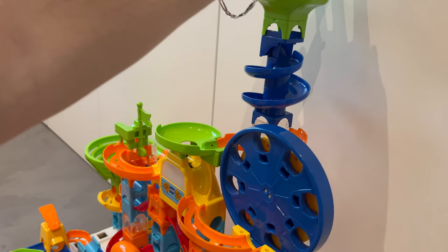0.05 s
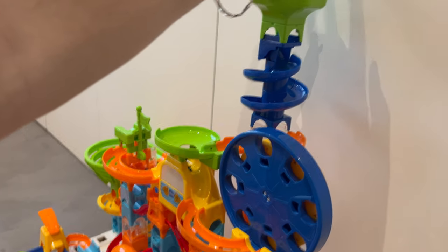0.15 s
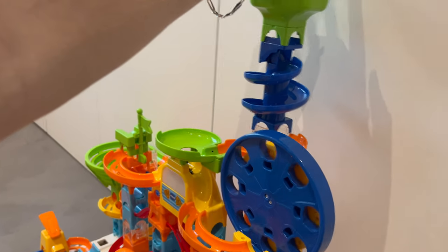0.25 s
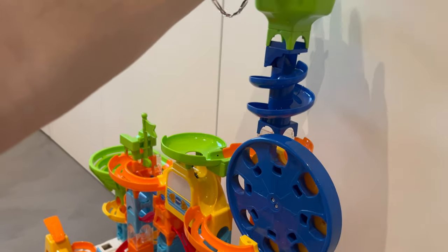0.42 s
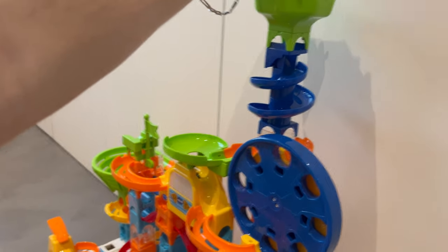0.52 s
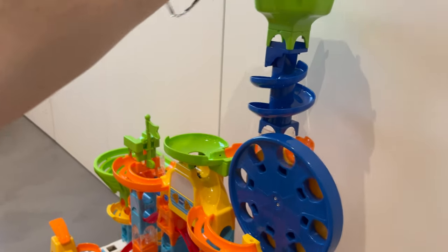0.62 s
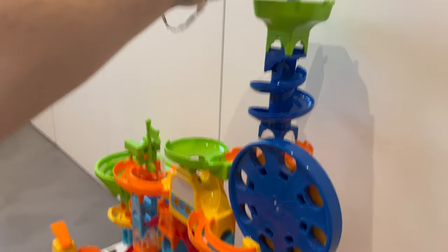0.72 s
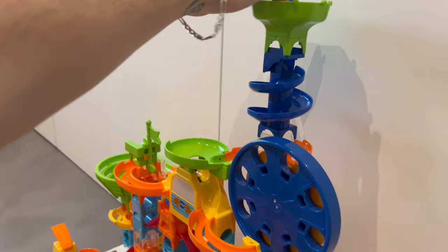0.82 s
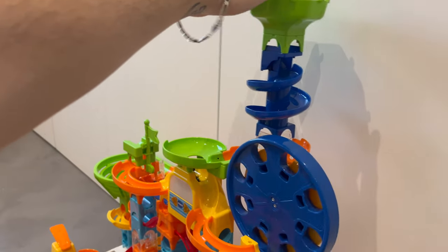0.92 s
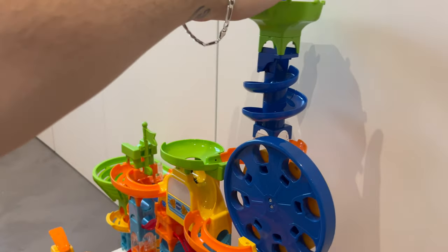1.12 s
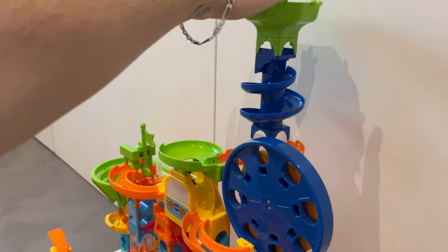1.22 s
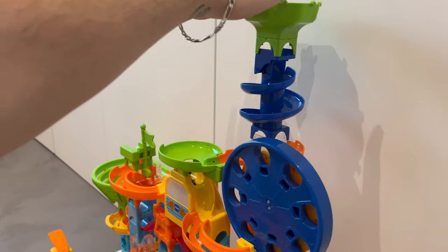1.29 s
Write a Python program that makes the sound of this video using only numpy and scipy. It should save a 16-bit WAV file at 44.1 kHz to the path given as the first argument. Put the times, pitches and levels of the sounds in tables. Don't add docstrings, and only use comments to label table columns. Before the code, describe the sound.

Plastic balls clack and rattle through a toy tower's chutes, pause, then tumble again more softly

```python
import sys
import numpy as np
from scipy import signal
from scipy.fft import rfft, irfft, next_fast_len
from scipy.io import wavfile
from scipy.ndimage import map_coordinates

SR = 44100
rng = np.random.default_rng(int(sys.argv[2]) if len(sys.argv) > 2 else 0)


def dump_mix(stems):
    frames = np.atleast_2d(stems).T
    limited = np.clip(frames, -1, 1)
    pcm = np.round(limited * 32767).astype(np.int16)
    wavfile.write(sys.argv[1], SR, pcm)


def gain_from_db(level_db):
    decades = np.asarray(level_db, float) / 20
    return 10 ** decades


N = 59535
BEFORE = SR // 4


def unit(x):
    return x / np.sqrt(np.mean(x ** 2) + 1e-20)


def along(points, hz):
    f, v = np.transpose(points)
    return np.interp(np.log(hz + 1), np.log(f + 1), v)


def filtered(x, response):
    m = next_fast_len(x.shape[-1] + 8192)
    spectrum = rfft(x, m) * response(np.fft.rfftfreq(m, 1 / SR))
    return irfft(spectrum, m)[..., :x.shape[-1]]


def wobble(rate_hz):
    knots = rng.standard_normal(int(N * rate_hz / SR) + 4)
    return map_coordinates(knots, [np.arange(N) * rate_hz / SR])


def dying(spectrum, t60_s, t, rise_s):
    noise = unit(filtered(rng.standard_normal(len(t)), spectrum))
    return noise * gain_from_db(-60 * t / t60_s) * (1 - np.exp(-t / rise_s))


# frequency in Hz, level in dB, t60 in seconds.
SHELL = [(810, -10, .15), (930, -10, .15), (1100, -10, .1), (1300, -12, .1), (1490, -10, .14),
         (1900, -6, .1), (2260, -8, .12), (2458, -5, .09), (2750, -6, .08), (2900, -5, .09),
         (3347, -5, .09), (3590, -8, .09), (4010, -9, .07), (4380, -6, .05)]
# frequency in Hz, level in dB.
WALL = [(300, -33), (600, -26.5), (1100, -2.5), (2000, 2), (3200, 1), (4600, -1.5), (6000, -10.5),
        (8000, -14.5)]
# frequency in Hz, level in dB.
CLICK = [(1500, -53), (3500, -8), (6000, -3), (8000, 4), (10500, -8), (13000, -8), (15000, -8),
         (16500, -12.5)]
# frequency in Hz, level in dB.
THUD = [(60, -38), (200, -24), (330, -14), (420, -4), (550, -5.5), (800, 0), (1200, -8), (2000, -30)]
MODES_DB, MODE_SPREAD_DB, DETUNE = -8.5, 2, .002
BEAT_HZ, SKEW_RAD = 14, .8
FOCUS_DB_PER_OCTAVE = 3.5
RISE_S, SLOW_RISE_S = .0008, .0018
PING_DB, PING_T60_S = -5, .06
SNAP_DB, SNAP_T60_S, SNAP_HZ = 1, .005, 3300
WALL_DB, WALL_T60_S, KNOCK_DB, KNOCK_T60_S = -13.5, .14, 6, .03
CLICK_DB, CLICK_T60_S, CRACK_DB, CRACK_T60_S = 9, .025, 4, .018
THUD_DB, THUD_T60_S = 1, .093


def clack(click_db, thud_db, focus_hz):
    t = np.arange(SR // 4) / SR

    def off_db(hz):
        return -FOCUS_DB_PER_OCTAVE * np.abs(np.log2((hz + 1) / focus_hz))

    def wall_colour(hz):
        return gain_from_db(along(WALL, hz) + off_db(hz))

    def click_colour(hz):
        return gain_from_db(along(CLICK, hz))

    def thud_colour(hz):
        return gain_from_db(along(THUD, hz))

    ring = np.zeros(len(t))
    for hz, db, t60_s in SHELL:
        louder, sharper, phase, beat = rng.standard_normal(4)
        level = gain_from_db(db + off_db(hz) + MODE_SPREAD_DB * louder - 60 * t / t60_s)
        tone = np.sin(2 * np.pi * hz * (1 + DETUNE * sharper) * t + SKEW_RAD * phase)
        ring += level * tone * np.cos(2 * np.pi * BEAT_HZ * beat * t)
    ping = gain_from_db(PING_DB - 60 * t / PING_T60_S) * np.sin(2 * np.pi * focus_hz * t)
    tonal = (gain_from_db(MODES_DB) * ring + ping) * (1 - np.exp(-t / RISE_S))

    snap = gain_from_db(SNAP_DB - 60 * t / SNAP_T60_S) * np.sin(2 * np.pi * SNAP_HZ * t)
    wall = dying(wall_colour, WALL_T60_S, t, RISE_S)
    wall += gain_from_db(KNOCK_DB) * dying(wall_colour, KNOCK_T60_S, t, SLOW_RISE_S)
    click = dying(click_colour, CLICK_T60_S, t, RISE_S)
    click += gain_from_db(CRACK_DB) * dying(click_colour, CRACK_T60_S, t, SLOW_RISE_S)
    thud = dying(thud_colour, THUD_T60_S, t, .0008)
    return (snap + tonal + gain_from_db(WALL_DB) * wall
            + gain_from_db(CLICK_DB + click_db) * click + gain_from_db(THUD_DB + thud_db) * thud)


# start in seconds, peak in dB, click over body in dB, thud over body in dB, ring focus in Hz.
EARLIER = [
    (-.06, -20.5, -21.5, -8.5, 1978),
    (-.01, -44, -18, -30.5, 1500),
]
# start in seconds, peak in dB, click over body in dB, thud over body in dB, ring focus in Hz.
FIRST_FALL = [(0.0544, -38, -28, -7.5, 1834), (0.0964, -41, -31, -39, 3530), (0.1885, -27, -25, -17, 3087),
              (0.192, -30, -24, -19, 1970), (0.2332, -19, -7, -21, 1830), (0.2387, -11.5, -8.5, -41, 3024),
              (0.241, -13, -7, -25, 4427), (0.2425, -18, -26, -25, 3365), (0.2445, -11, -37, -26, 1880),
              (0.2674, -18, -21, -25, 2222), (0.2824, -16.5, -14.5, -31, 2370),
              (0.3043, -11.5, -24.5, -31.5, 2455), (0.3066, -24.5, -14, -10.5, 3430),
              (0.3174, -19.5, -16.5, -20, 2760), (0.3394, -11.5, -20, -21, 1872),
              (0.347, -19, -29.5, -19.5, 2234), (0.3614, -17, -15.5, -21.5, 1890),
              (0.3744, -18.5, -26.5, -18, 2220), (0.3955, -28.5, 0, -19, 2840),
              (0.3983, -17, -4.5, -15.5, 2170), (0.4017, -21, -7, -17.5, 3210),
              (0.4114, -16.5, -38, -28, 1485), (0.425, -19.5, -35, -23, 1500),
              (0.4395, -24.5, -11.5, -12, 2846), (0.446, -22.5, -21, -12.5, 1500),
              (0.553, -46, -44, -35, 3630)]
# start in seconds, peak in dB, click over body in dB, thud over body in dB, ring focus in Hz.
SECOND_FALL = [(0.8037, -34, -12.5, -10, 2240), (0.807, -22, -15.5, -14.5, 2234),
               (0.815, -27.5, -23, -17.5, 1004), (0.8245, -23, -22.5, -18.5, 2850),
               (0.8642, -31, -15, -29, 2210), (0.8756, -26, -11.5, -11, 1900),
               (0.882, -22.5, -14, -17.5, 2800), (0.8914, -26.5, -18, -18, 783),
               (0.9039, -25, -16, -11.5, 2044), (0.9193, -26, -22, -24, 1900),
               (0.9595, -23, -10.5, -10.5, 2524), (0.963, -19.5, -24, -18, 2990),
               (0.967, -18.5, -11.5, -19, 1935), (0.9853, -25, -14, -16, 2300),
               (1.009, -22.5, -20, -13, 1900), (1.0135, -24.5, -8.5, -8, 920),
               (1.0183, -14, -24, -18.5, 3423), (1.021, -14, -34.5, -18.5, 2970),
               (1.026, -26, -21, -19, 2387), (1.0864, -36, -11, -8, 915), (1.098, -29.5, -19, -9, 1928),
               (1.163, -34, -19, -8, 2040), (1.1718, -29, -19.5, -10, 2865), (1.177, -33, -23, -15, 757),
               (1.184, -30.5, -22, -15, 2650), (1.189, -34, -30, -13, 4380), (1.2231, -32, -25, -14.5, 950),
               (1.3117, -45, -31, -8.5, 2050), (1.3349, -34, -26, -6, 935),
               (1.3385, -31, -15.5, -13.5, 1900), (1.3418, -28, -48, -27, 2020)]


def clacks():
    out = np.zeros(BEFORE + N + SR)
    for s, db, *colour in list(EARLIER) + list(FIRST_FALL) + list(SECOND_FALL):
        out[BEFORE + round(s * SR):][:SR // 4] += gain_from_db(db) * clack(*colour)
    return out[:BEFORE + N]


# time in seconds, level in dB.
RATTLE = [(0, -41), (.12, -58), (.17, -61), (.225, -56), (.25, -31.5), (.44, -29), (.5, -44), (.62, -47),
          (0.786, -58.5), (.82, -36.5), (0.929, -33.5), (.955, -62), (0.982, -26.5), (1.05, -40.5),
          (1.11, -45), (1.15, -53), (1.2, -40.5), (1.29, -53)]
RATTLE_PER_S, RATTLE_DB, SCATTER_DB = 260, -5, 4


def rattle(places=8):
    s, db = np.transpose(RATTLE)
    strength = gain_from_db(RATTLE_DB + np.interp(np.arange(-BEFORE, N) / SR, s, db))
    struck = rng.random((places, BEFORE + N)) < RATTLE_PER_S / places / SR
    taps = struck * gain_from_db(SCATTER_DB * rng.standard_normal(struck.shape))
    sounds = np.array([clack(-26.5, -15.5, 2200 * 1.57 ** rng.normal()) for _ in range(places)])
    return signal.fftconvolve(taps * strength, sounds, axes=1)[:, :BEFORE + N].sum(0)


# centre in Hz, width in Hz, level in dB.
TRACK = [(950, 180, -5.5), (1500, 45, -12), (1900, 200, -3), (2312, 96, 5), (3150, 450, -32),
         (3685, 140, 5.5), (4306, 250, 5)]
# time in seconds, level in dB.
ROLLING = [
    (0, -57.5),
    (.15, -59),
    (.5, -52),
    (.7, -55),
    (.8, -52.5),
    (1.3, -59),
]
PATCH_DB = 0
HUM_HZ, HUM_DB, HUM_DRIFT_RAD = 419, -5, .82


def rolling():
    def track(f):
        return sum(gain_from_db(db) * (1j * f * w / (c * c - f * f + 1j * f * w)) ** 2 for c, w, db in TRACK)

    t = np.arange(N) / SR
    grit = rng.standard_normal(N) * gain_from_db(PATCH_DB * wobble(35))
    hum = np.sin(2 * np.pi * HUM_HZ * t + HUM_DRIFT_RAD * wobble(22))
    hum *= gain_from_db(2 * wobble(24))
    s, db = np.transpose(ROLLING)
    return gain_from_db(np.interp(t, s, db)) * (unit(filtered(grit, track)) + gain_from_db(HUM_DB) * hum)


# frequency in Hz, level in dB.
AIR = [(25, -5.5), (60, -6), (120, -9.5), (250, -22), (600, -32), (1500, -0.5), (4500, -17), (7500, -18)]
# frequency in Hz, correlation.
AIR_ALIKE = [(60, 0.14), (240, 0.36), (950, -1.1), (3770, 0.59), (15000, 0.098)]
# frequency in Hz, level in dB.
HISS = [(6000, -16.5), (8500, -5), (10500, 22.5), (13500, 15.5), (15000, -23)]
AIR_DB, HISS_DB = -57, -72


def air():
    def air_colour(hz):
        turn = np.arccos(np.clip(along(AIR_ALIKE, hz), -1, 1)) / 2
        return gain_from_db(along(AIR, hz)) * (hz < 9000) * [np.cos(turn), np.sin(turn)]

    def hiss_colour(hz):
        return gain_from_db(along(HISS, hz)) * (hz > 5000)

    mid, side = filtered(rng.standard_normal((2, N)), air_colour)
    floor = unit(np.array([mid + side, mid - side]))
    hiss = unit(filtered(rng.standard_normal((2, N)), hiss_colour))
    return gain_from_db(AIR_DB) * floor + gain_from_db(HISS_DB) * hiss


# start in seconds, level in dB, centre in Hz.
BUMPS = [(.187, -60, 197), (0.24, -33.5, 416), (0.287, -60, 90.6), (0.398, -31.5, 328), (0.448, -61, 129),
         (0.819, -55, 90), (1.114, -40, 174), (1.115, -51, 60), (1.133, -50.5, 92), (1.157, -43.5, 247),
         (1.184, -57, 91)]
BUMP_T60_S, BUMP_SHARPNESS = .11, 2.2


def base():
    out = np.zeros(N + SR)
    t = np.arange(SR // 4) / SR
    for s, db, centre_hz in BUMPS:
        def hollow(hz):
            return 1 / (1 + (BUMP_SHARPNESS * (hz / centre_hz - centre_hz / (hz + 1))) ** 2)

        out[round(s * SR):][:len(t)] += gain_from_db(db) * dying(hollow, BUMP_T60_S, t, .0045)
    return out[:N]


# start in seconds, level in dB.
TICKS = [(.2388, -16), (0.2411, -14.5), (.282, -37), (.3045, -25.5), (.318, -28), (.34, -29), (0.3616, -33),
         (.3745, -33), (0.3971, -21.5), (0.4013, -27), (0.4114, -39.5), (0.4417, -30.5), (0.807, -46),
         (.96, -36), (0.9654, -23), (0.969, -40), (1.0135, -28.5), (1.017, -31)]
TICK_HZ, TICK_SPREAD, TICK_T60_S = 11100, .11, .0046


def ticks():
    out = np.zeros(N + SR)
    t = np.arange(SR // 40) / SR
    for s, db in TICKS:
        hz = TICK_HZ * np.exp(TICK_SPREAD * rng.standard_normal((3, 1)))
        ring = np.sin(2 * np.pi * hz * t).sum(0)
        out[round(s * SR):][:len(t)] += gain_from_db(db - 60 * t / TICK_T60_S) * ring
    return out[:N]


# frequency in Hz, t60 in seconds.
ROOM = [(200, 0.28), (2000, 0.34), (6000, 0.27), (11000, 0.26), (15000, 0.096)]
NEW_ECHO_S = [.29, .39, .7, .95]
ROOM_DB, WALL_DELAY_S = -6, .006


def room(x):
    noise = rng.standard_normal((len(NEW_ECHO_S) + 1, 2, SR // 2))
    hz, t, z = signal.stft(noise, SR, nperseg=256)
    decay = gain_from_db(-60 * t / along(ROOM, hz)[:, None])
    tails = signal.istft(z * decay, SR, nperseg=256)[1]
    tails = tails / np.linalg.norm(tails[0, 0])

    stretch = np.searchsorted(NEW_ECHO_S, (np.arange(len(x)) - BEFORE) / SR)
    parts = x * (stretch == np.arange(len(tails))[:, None])
    parts = np.pad(parts, ((0, 0), (round(WALL_DELAY_S * SR), 0)))
    return signal.fftconvolve(parts[:, None], tails, axes=2)[..., :len(x)].sum(0)


# frequency in Hz, phase in radians.
LEAD = [(1400, -.5), (3200, .7), (4700, .5), (5700, -1.5), (8500, -3.2), (11100, -6), (12700, -6.4),
        (14600, -9)]
# frequency in Hz, level in dB.
TILT = [(60, 0), (180, 2.5), (550, -1.5), (1650, 0), (5000, 2), (9000, 0)]


def scene():
    toy = clacks() + rattle() + np.pad(rolling() + base() + ticks(), (BEFORE, 0))
    half = np.array([[.5], [-.5]])

    def ports(hz):
        return gain_from_db(half * along(TILT, hz)) * np.exp(1j * half * along(LEAD, hz))

    heard = filtered(toy, ports) + gain_from_db(ROOM_DB) * room(toy)
    return heard[:, BEFORE:] + air()


def roll_off(x):
    return signal.sosfilt(signal.butter(12, 16800, fs=SR, output="sos"), x)


# frequency in Hz, level in dB.
MIC = [(20, -23.5), (80, -3.5), (14500, -3), (15700, 0.5), (16500, -31)]


def record(dry):
    def dip(centre_hz, width_hz, db):
        return lambda hz: gain_from_db(db * np.exp(-((hz - centre_hz) / width_hz) ** 2))

    mid = filtered((dry[0] + dry[1]) / 2, dip(8400, 650, -17))
    side = filtered((dry[0] - dry[1]) / 2, dip(11800, 600, -21))
    mix = filtered(np.array([mid + side, mid - side]), lambda hz: gain_from_db(along(MIC, hz)))
    return roll_off(mix)


dry = scene()
out = record(dry)
dump_mix(out)
```